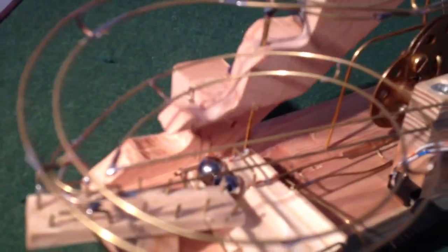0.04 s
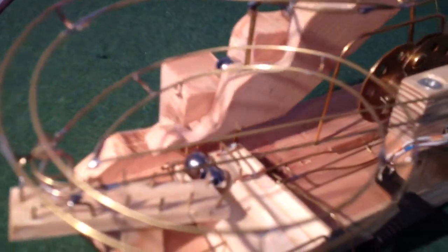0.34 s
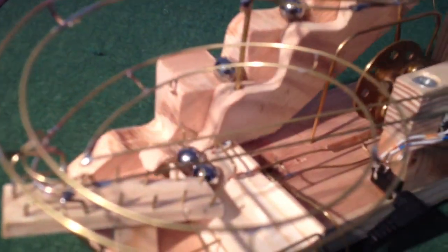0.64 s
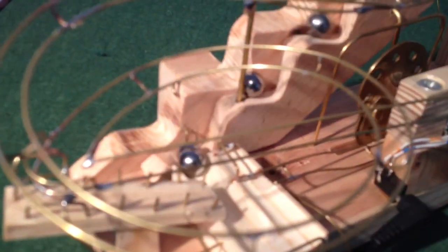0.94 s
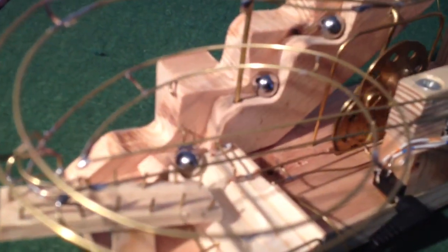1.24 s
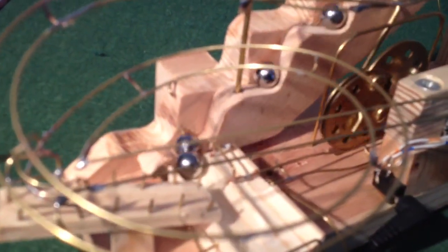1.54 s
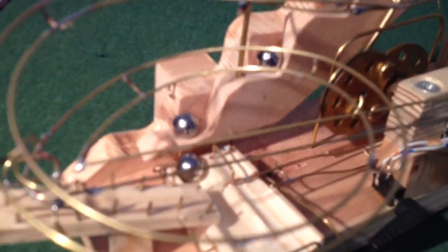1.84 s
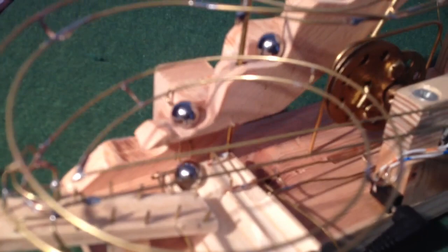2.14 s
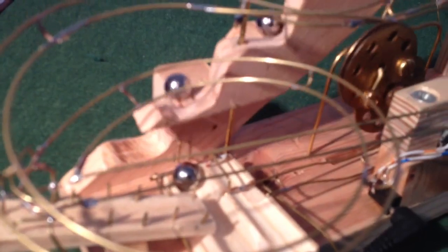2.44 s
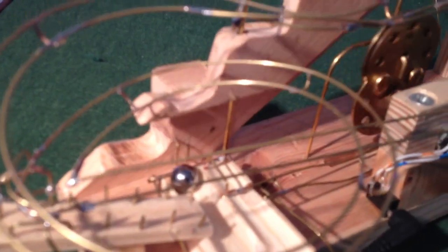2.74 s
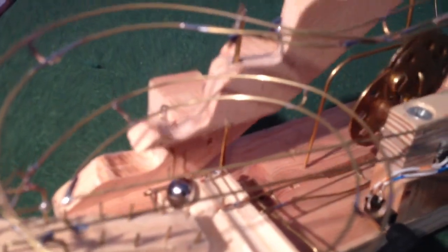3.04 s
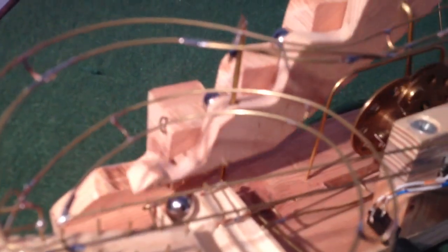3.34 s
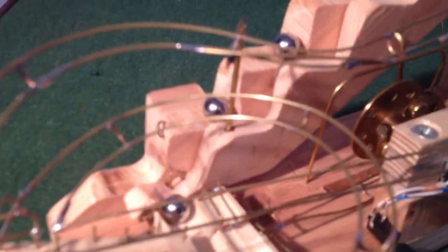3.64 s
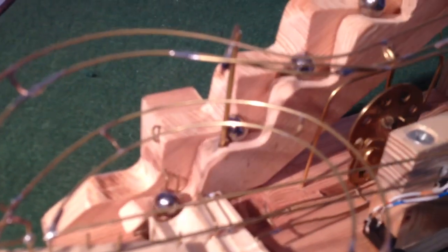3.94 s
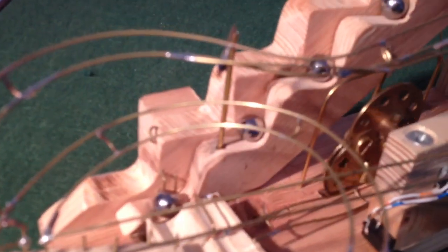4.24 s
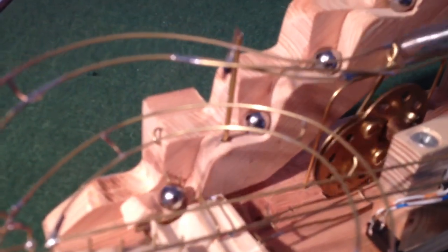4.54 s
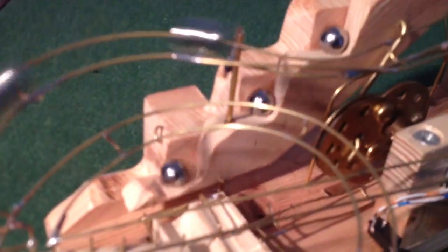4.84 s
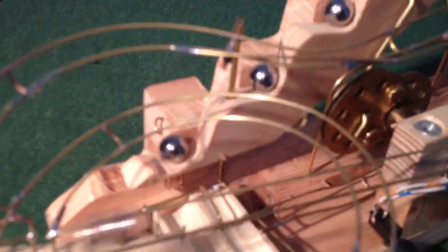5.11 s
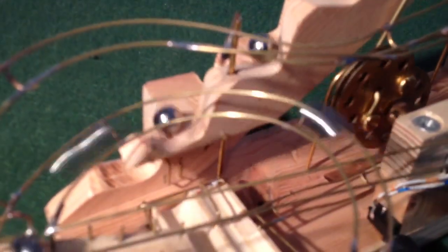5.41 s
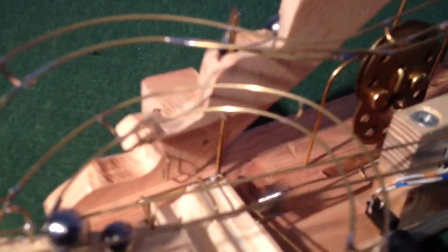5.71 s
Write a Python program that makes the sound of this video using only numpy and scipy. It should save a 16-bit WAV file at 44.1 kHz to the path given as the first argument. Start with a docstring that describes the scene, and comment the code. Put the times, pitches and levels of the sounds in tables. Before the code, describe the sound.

A small geared motor whines over a low rumble, slowing and speeding up as it cranks the wooden stair lift of a marble machine. Steel balls drop onto the steps in two quick bursts of knocks and clinks, about three seconds apart. Then a ball rolls down a spiral wire track with a growing metallic rasp and clatters into the bottom lane. The microphone is close, in a quiet room.

```python
"""A small geared motor whines, close to one microphone in a quiet room, cranking the wooden stair lift
of a marble machine. Its gears slow down and rumble under load and chatter when they run slack.
Steel balls skid, drop from step to step, bounce and clink, ringing the steps and the frame;
then one rolls down a spiral wire track and rattles into the bottom lane."""
import sys
import numpy as np
from scipy import signal
from scipy.fft import rfft, irfft, next_fast_len
from scipy.io import wavfile
from scipy.ndimage import uniform_filter1d

SR = 44100
rng = np.random.default_rng(int(sys.argv[2]) if len(sys.argv) > 2 else 0)


def log_audio(samples):
    """Write samples as a 16-bit WAV file to the path given in sys.argv[1]."""
    # one column per channel
    frames = np.atleast_2d(samples).T
    # limit to full scale, then quantise
    limited = np.clip(frames, -1, 1)
    pcm = np.round(limited * 32767).astype(np.int16)
    wavfile.write(sys.argv[1], SR, pcm)


N = 258867
TIME = np.arange(N) / SR


def from_db(db):
    """Decibels to gain."""
    return 10 ** (np.asarray(db) / 20)


def unit_rms(x):
    """Scale to rms 1."""
    return x / np.sqrt(np.mean(x ** 2) + 1e-20)


def drift(per_s):
    """Smooth random wander with a spread near 1."""
    knots = rng.standard_normal(8192)
    return np.interp(TIME * per_s, np.arange(len(knots)), knots)


def each_turn(rows, crank_turn_s=3.03):
    """Read a table that repeats with every turn of the crank."""
    return np.interp(TIME, *np.transpose(rows), period=crank_turn_s)


def coloured(x, spectrum):
    """Shape a sound with a spectrum that falls away beyond both ends; rms 1."""
    hz, db = np.transpose(spectrum)
    size = next_fast_len(N + 4096)
    bins = np.maximum(np.fft.rfftfreq(size, 1 / SR), 1)
    gain_db = np.interp(np.log(bins), np.log(hz), db)
    gain_db -= 24 * np.maximum(np.log2(hz[0] / bins), 0) + 25 * np.maximum(np.log2(bins / hz[-1]), 0)
    return unit_rms(irfft(rfft(x, size) * from_db(gain_db), size)[:N])


def ring(force, modes, sharpness, wander_db=0.0):
    """Long modes, each f / sharpness wide; they may swell and fade as a ball passes their nodes."""
    out = 0
    for k, (hz, db) in enumerate(modes):
        r = np.exp(-np.pi * hz / sharpness / SR)
        feedback = [1, -2 * r * np.cos(2 * np.pi * hz / SR), r * r]
        push = force * from_db(db + wander_db * drift(14))
        out += (-1) ** k * signal.lfilter(np.array([1, 0, -1]) * (1 - r * r) / 2, feedback, push + 1e-18)
    return out


# harmonics of the pinion: [multiple of the tooth rate, level/dB]
PINION_TONES = [(2, 0), (3, -2), (4, 3.5), (5, -2), (6, -0.5), (7, 2), (8, -2), (9, -0.5), (10, -3.5),
                (11, -19)]
# the gear housing rings where a mesh tone crosses its resonances: [f/Hz, level/dB]
HOUSING_RESPONSE = [(1500, -74), (2450, -58), (3400, -79), (3900, -62), (4350, -70), (4900, -80),
                    (5550, -63.5), (6200, -60), (7000, -70), (7800, -51), (8400, -56.5), (9100, -63),
                    (10200, -62), (10900, -55), (12300, -62), (15000, -78)]

def whine(turns, speed, teeth=12, waver_db=3.0, rasp=0.95):
    """Mesh tones and weaker ones between; uneven teeth make them buzz, and strain smears them."""
    strain = np.clip((102 - speed) / 10, 0, 1)   # the motor labours below 102 turns per s
    out = 0
    for harmonic, level_db in PINION_TONES:
        mesh = teeth * round(harmonic)
        slip = (1 + 2.5 * strain) * np.sqrt(harmonic / len(PINION_TONES)) * drift(400)
        tooth_errors = unit_rms(np.diff(rng.standard_normal(11)))
        buzz = 1 + .45 * np.interp(turns, np.arange(10) / 10, tooth_errors, period=1)
        for order, order_db in ((mesh, level_db), (mesh + 6, level_db - 7)):
            housing_db = np.interp(order * speed, *np.transpose(HOUSING_RESPONSE))
            gain = from_db(order_db + housing_db + waver_db * drift(21.96))
            phase = 2 * np.pi * order * turns + slip
            out += gain * (buzz * np.sin(phase) + rasp * drift(180) * np.cos(phase))
    return out


# backlash of the gears: [f/Hz, level/dB]
CHATTER_SPECTRUM = [(1000, -26), (1450, -14), (1800, -3.5), (2500, -4), (2900, -1), (3350, -13),
                    (4300, -59), (5000, -12.5), (8000, -6.5), (9500, -19.5)]
# tones of the free-running gears: [multiple of the motor speed, level/dB against the chatter]
SLACK_TONES = [(17, -13), (24, -10), (36, -13)]

def chatter(turns, slap, loose_play=1.05):
    """Backlash: the same teeth come round on every motor turn, with some loose play on top."""
    teeth = np.interp(turns % 1 * 360, np.arange(360), rng.standard_normal(360))
    force = slap * (teeth + loose_play * rng.standard_normal(N)) * from_db(1.2 * drift(120))
    tones = sum(from_db(db + 2.5 * drift(15)) * np.sin(2 * np.pi * order * turns + .4 * drift(200))
                for order, db in SLACK_TONES)
    return coloured(force, CHATTER_SPECTRUM) + tones


# hiss of sliding teeth and fine sizzle of dry teeth: [f/Hz, level/dB]
HISS_SPECTRUM = [(1000, -25), (2000, -2.5), (2700, 4), (3400, -5), (4150, 7.5), (5100, -7), (6500, 1),
                 (8100, -2), (9300, -6), (11000, -2.5), (15500, -17)]
SIZZLE_SPECTRUM = [(9800, -21), (11000, 3.5), (12600, -5), (13700, 2.5), (15500, -8)]
# tooth pressure and sizzle through one crank turn: [t/s, level/dB]
TOOTH_PRESSURE = [(0, -5), (.3, -1), (.82, -1), (.95, -23), (1.2, -8.5), (1.43, -11.5), (1.65, -6.5),
                  (2.3, -3.5), (2.65, -3.5)]
SIZZLE_CYCLE = [(0, -61), (.25, -52), (.6, -54.5), (.95, -55), (1.27, -65), (1.38, -55), (2.1, -64),
                (2.5, -54.5), (2.78, -69)]

def sliding_teeth(slap, hiss_db=-49.0, flutter_db=2.5, grit_db=3.0):
    """Teeth hiss with the pressure on them; their sizzle is lowest where the gears go slack."""
    friction = rng.standard_normal(N) * from_db(flutter_db * drift(150) + grit_db * drift(1200))
    hiss = coloured(friction, HISS_SPECTRUM) * from_db(hiss_db + each_turn(TOOTH_PRESSURE))
    sizzle = coloured(slap * rng.standard_normal(N), SIZZLE_SPECTRUM)
    return hiss + sizzle * from_db(each_turn(SIZZLE_CYCLE))


# motor speed through one crank turn: [t/s, turning rate/Hz]
MOTOR_SPEED = [(0, 117), (.25, 102.5), (.42, 100), (.78, 108.5), (.98, 104.5), (1.09, 107.5), (1.18, 120.5),
               (1.35, 121), (1.42, 98), (1.6, 83), (2.03, 74), (2.29, 74), (2.56, 106.5), (2.7, 113),
               (2.82, 120.5)]
# balance of the gear sounds at each speed: [turning rate/Hz, whine gain/dB, chatter gain/dB]
GEAR_BALANCE = [(78.4, -5.5, -74), (98, -2.5, -64), (106.5, -1.5, -64), (111.3, 0.5, -56), (114, 2, -50.5),
                (121.3, -10, -47.5)]

def motor(wobble=0.00309):
    """Each stroke of the stairs slows the motor; the gears chatter most when they run fast and slack."""
    speed = each_turn(MOTOR_SPEED)
    turns = np.cumsum(speed * (1 + wobble * drift(45))) / SR
    speeds, *levels = np.transpose(GEAR_BALANCE)
    whine_gain, chatter_gain = [from_db(np.interp(speed, speeds, db)) for db in levels]
    slap = np.exp(.3 * np.cos(2 * np.pi * turns))   # one swell per motor turn
    return chatter_gain * chatter(turns, slap) + sliding_teeth(slap) + whine_gain * whine(turns, speed)


# rumble of the frame: [f/Hz, level/dB]
RUMBLE_SPECTRUM = [(50, -31), (68, -26.5), (92, -5.5), (112, -8), (137, 3.5), (172, -7), (198, -3),
                   (225, -15), (290, -6.5), (330, -21.5), (375, -8.5), (420, -19), (900, -23), (1600, -20)]
# load on the frame through one crank turn: [t/s, level/dB]
FRAME_LOAD = [(0, -3.5), (.2, 0.5), (.7, 1.5), (.92, -2.5), (1.17, -9), (1.3, -7.5), (1.42, -3),
              (2.12, -0.5), (2.21, 1), (2.5, 2), (2.72, -1.5), (2.85, -9)]

def frame_rumble(level_db=-55.5, deep_hz=115, deep_swing=1.7, throb_db=2.0):
    """The loaded frame rumbles and throbs; its deepest part follows the load most."""
    load_db = each_turn(FRAME_LOAD)
    noise = coloured(rng.standard_normal(N) * from_db(throb_db * drift(24)), RUMBLE_SPECTRUM)
    deep = signal.sosfiltfilt(signal.butter(4, deep_hz, fs=SR, output="sos"), noise)
    return from_db(level_db) * ((noise - deep) * from_db(load_db) + deep * from_db(deep_swing * load_db))


def ticks(per_s=35, level_db=-57.0, spread_db=0.5, t60_s=0.0083):
    """Crank, pivots and waiting balls give faint ticks at random."""
    sizes = from_db(spread_db * np.minimum(rng.exponential(1, N), 2.5))
    clicks = sizes * (rng.random(N) < per_s / SR)
    envelope = signal.lfilter([1], [1, -from_db(-60 / (t60_s * SR))], clicks + 1e-18)
    return from_db(level_db) * envelope * coloured(rng.standard_normal(N), HISS_SPECTRUM)


# a ball skids or jostles: [t/s, level/dB, share on wood rather than wire 0-1]
BALL_SKIDS = [(0.467, -40, 0.8), (0.614, -40.5, 0.3), (0.647, -41, 0.4), (1.754, -48.5, 0), (2.579, -42, 1),
              (2.637, -35.5, 1), (3.448, -40, 1), (3.822, -34, 0.43), (4.262, -42, 0), (4.396, -40, 1),
              (4.446, -31, 0), (5.22, -26, 0), (5.344, -30, 0), (5.521, -26.5, 0.12), (5.676, -26.5, 0.17)]
# a ball rolls off a step, along the top ramp, down the spiral or into the bottom lane:
# [t/s, length/s, starting level/dB, swell/(dB per s), 60 dB decay/s, share on wood 0-1]
BALL_ROLLS = [(0.637, 0.21, -52.5, -9, 0.04, 1), (3.544, 0.11, -49.5, -1, 2.5, 1),
              (3.969, 0.12, -42.5, -1, 0.47, 0.8), (4.1, 0.38, -49.5, 21.5, 5, 0.1),
              (4.457, 0.89, -37.5, 6, 2, 0), (4.69, 0.19, -41, 11, 1.5, 0.05),
              (5.247, 0.27, -34.5, 1, 1.8, 0.06), (5.57, 0.21, -35.5, -18, 4, 0.74)]

def roll_power(skid_t60_s=0.28, skid_attack_s=0.0016, roll_attack_s=0.014):
    """Total power and the part on wood: skids just die away, rolls first swell or sink with speed."""
    skids = [(s, 0, db, 0, skid_t60_s, wood, skid_attack_s) for s, db, wood in BALL_SKIDS]
    rolls = [(*row, roll_attack_s) for row in BALL_ROLLS]
    power = on_wood = 0
    for s, length, db, swell, t60, wood, attack in skids + rolls:
        age = TIME - s
        level_db = db + swell * np.clip(age, 0, length) - 60 * np.clip((age - length) / t60, 0, 2)
        part = (np.clip(age / attack, 0, 1) * from_db(level_db)) ** 2
        power += part
        on_wood += wood * part
    return power, on_wood


def bumps(per_s=6000, spread_db=1.5):
    """Tiny random impacts under a rolling ball; rms 1."""
    sizes = from_db(spread_db * np.minimum(rng.exponential(1, N), 4)) * rng.choice([-1, 1], N)
    return unit_rms(sizes * (rng.random(N) < per_s / SR))


def along_the_rail(force, echo=0.37, echo_s=.0014):
    """Bumps echo from the nearest support; the delay wanders as the ball travels, so resonances slide."""
    delay = echo_s * np.exp(0.292 * drift(5))
    return force + echo * np.interp(TIME - delay, TIME, force)


# rasp of a rolling ball, and the board drumming under it: [f/Hz, level/dB]
RASP_SPECTRUM = [(200, -43), (480, -15), (800, -24.5), (1200, -15.5), (1700, -8), (2050, 1), (2900, -2),
                 (4300, 3), (4900, -3), (7500, 1), (8900, -1), (9800, -6.5), (11800, -6), (13500, -14),
                 (15500, -18)]
BOARD_SPECTRUM = [(220, -1), (550, -5), (900, -8.5), (1500, -4), (2500, -3)]
# long modes of the wire track and of the wooden frame: [f/Hz, level/dB]
WIRE_MODES = [(1388, -2), (2028, -2.5), (2170, 1.5), (2654, -2), (3071, -1), (3442, 0.5), (4085, 0),
              (4355, 0.5), (5425, -3), (5780, -5.5), (6149, -3.5), (6336, -5), (7300, -1.5), (7530, -3),
              (8450, -3.5)]
FRAME_MODES = [(375, -12), (1385, -2.5), (1728, -14), (1932, -4), (2060, -4.5), (2170, -6), (2300, -1.5),
               (2550, -11), (2660, -8), (3075, 2), (3450, -9.5), (3624, 0), (3760, 0.5), (4380, 3.5),
               (5500, -13), (6200, 2), (7500, 2)]
FRAME_SHARPNESS = 79

def rolling(wire_db=-3.5, frame_db=-3.5, board_db=-9.5, rumble_db=-22.0, judder_db=1.88):
    """Bumps under a skidding or rolling ball rasp, ring the wire or the wood, and build up a rumble."""
    power, on_wood = roll_power()
    on_wire = np.maximum(power - on_wood, 0)
    judder = unit_rms(from_db(judder_db * drift(170)))
    force = bumps() * judder
    rasp = np.sqrt(power) * coloured(along_the_rail(force), RASP_SPECTRUM)
    wire = from_db(wire_db) * unit_rms(ring(bumps() * judder, WIRE_MODES, sharpness=137, wander_db=2.5))
    board = from_db(board_db) * coloured(force, BOARD_SPECTRUM)
    frame = from_db(frame_db) * unit_rms(ring(bumps() * judder, FRAME_MODES, FRAME_SHARPNESS))
    build_up = uniform_filter1d(np.sqrt(power), int(0.13 * SR))
    rumble = build_up * from_db(rumble_db) * coloured(rng.standard_normal(N), RUMBLE_SPECTRUM)
    return rasp + np.sqrt(on_wire) * wire + np.sqrt(on_wood) * (board + frame) + rumble


# a ball lands or bounces on a step or in the bottom lane:
# [t/s, level/dB, board thud/dB, brightness/(dB per octave), frame shake/dB]
BALL_LANDINGS = [(0.5486, -17, 5, -7, -0.5), (0.5779, -15, 4.5, -7, -1), (0.6128, -16.5, 3, -7, 0),
                 (0.6447, -12, -4.5, -14, -2), (0.689, -29, 8, -21, 9), (0.729, -14, 2, 0, 4),
                 (0.7629, -13, 5.5, -3.5, 4), (1.0407, -30.5, 18, 9, -2.5), (2.537, -31, 13, -15, 3),
                 (2.647, -17, 8, 3, 2.5), (3.5262, -15.5, 2, -4.5, -4), (3.5567, -18.5, 4, -17, -2),
                 (3.5896, -17, 3, -16, -1), (3.6187, -15, 0, -8.5, 1), (3.6867, -14, 0, -24, -2),
                 (3.718, -18, 6.5, -10, -1), (3.742, -12.5, -3, -1, -9.5), (5.402, -5, -5, -7.5, -1.5),
                 (5.544, -17, -1, -3, 8), (5.577, -19.5, -8, -2, 6), (5.666, -10.5, -11, -5, 2),
                 (5.843, -15, -3, -3.5, -6)]
# a ball clinks against another: [t/s, level/dB]
BALL_CLINKS = [(0.858, -19.5), (0.889, -35), (0.906, -28), (1.838, -33.5), (2.575, -35), (3.774, -24),
               (3.884, -18.5), (4.083, -24)]
# wood taps dully on wood: [t/s, level/dB, frame shake/dB]
WOOD_TAPS = [(1.103, -28.5, 1), (1.1095, -29, -1), (1.892, -34, -5), (4.121, -29.5, 3), (4.144, -31.5, -2),
             (4.924, -32.5, -3)]
# a ball ticks dryly against the guide wire: [t/s, level/dB]
GUIDE_WIRE_TICKS = [(2.51, -22.5)]
# centres of the board, body, edge and steel bands: [f/Hz]
BAND_CENTRES = [700, 2100, 4100, 7000]
# tone of each kind of blow in those four bands: [level/dB]
LANDING_BANDS = [-32, -12.5, -14.5, -26]
CLINK_BANDS = [-22.5, -16.5, -13.5, -12]
TAP_BANDS = [-14, -17, -24, -25]

def blows(edge_bands_db=(-37, -14.5, -11, -41), edge_shake_db=-9):
    """Every blow on wood or steel as [t/s, level/dB, four band levels/dB, frame shake/dB]."""
    octaves = np.log2(np.array(BAND_CENTRES[1:]) / BAND_CENTRES[1])
    rows = [(s, db, LANDING_BANDS + np.r_[thud_db, brightness * octaves], shake_db)
            for s, db, thud_db, brightness, shake_db in BALL_LANDINGS]
    rows += [(s, db, CLINK_BANDS, 0) for s, db in BALL_CLINKS]
    rows += [(s, db, edge_bands_db, edge_shake_db) for s, db in GUIDE_WIRE_TICKS]
    return rows + [(s, db, TAP_BANDS, shake_db) for s, db, shake_db in WOOD_TAPS]


# short modes of a wooden step with a ball on it: [f/Hz, level/dB]
STEP_MODES = [(380, -11.5), (540, -2.5), (780, -5), (1080, -3), (1420, 3.5), (1750, 3.5), (2130, 8.5),
              (2560, 9), (2880, 4.5), (3550, -1.5), (4000, 5), (4500, -8.5), (5400, -7), (6300, 0.5),
              (7300, -7), (8500, -8)]

def struck_step(t, spread_s=0.00084, scatter_db=2.0):
    """A step rings briefly; arrival, strength and sign of each mode vary with where the ball lands."""
    hz, db = np.transpose(STEP_MODES)
    t60 = 0.014 * (2000 / hz[:, None]) ** 0.53   # higher modes die sooner
    age = np.maximum(t - spread_s * rng.random((len(hz), 1)), 0)
    modes = np.sin(2 * np.pi * hz[:, None] * age) * from_db(-60 * age / t60)
    strengths = from_db(db + scatter_db * rng.standard_normal(len(hz))) * rng.choice([-1, 1], len(hz))
    return strengths @ modes


# limits of the board, body, edge and steel bands: [f/Hz]
BAND_LIMITS = [300, 1270, 3100, 5500, 10000]

def knocks(level_db=-3.5, ring_db=3.0, buzz_db=-4.0, buzz_t60_s=0.12, travel_s=0.001176):
    """Each blow sounds the step; the ball buzzes as it settles and the frame rings on."""
    t = TIME[:SR // 5]
    bands = [signal.butter(4, edges, "band", fs=SR, output="sos")
             for edges in zip(BAND_LIMITS, BAND_LIMITS[1:])]
    direct, shaken = np.zeros((2, N + len(t)))
    for s, blow_db, bands_db, shake_db in blows():
        step = struck_step(t)
        parts = [signal.sosfilt(band, step) for band in bands]
        knock = sum(from_db(blow_db + level_db + db) * part / np.std(part[:SR // 200])
                    for db, part in zip(bands_db, parts))   # levels hold for the first 5 ms
        settling = rng.standard_normal(len(t)) * rng.exponential(1, len(t))
        settling *= from_db(-60 * t / buzz_t60_s) * (t > .002)
        buzz = signal.fftconvolve(knock, settling / np.linalg.norm(settling))[:len(t)]
        start = int((s + travel_s) * SR)
        direct[start:start + len(t)] += knock + buzz * from_db(shake_db + buzz_db)
        shaken[start:start + len(t)] += knock * from_db(shake_db + ring_db)
    return direct[:N] + ring(shaken[:N], FRAME_MODES, FRAME_SHARPNESS)


def room(x, wet_db=-6, t60_s=0.37, delay_s=0.0024):
    """Dense reflections from the table and walls reach the microphone just after the direct sound."""
    t = TIME[:SR // 2]
    tail = rng.standard_normal(len(t)) * from_db(-60 * t / t60_s) * (t > delay_s)
    return x + from_db(wet_db) * signal.fftconvolve(x, tail / np.linalg.norm(tail))[:N]


def scene():
    """The machine from close by, in mono; the room answers only the knocks."""
    return (motor() + frame_rumble() + ticks() + room(knocks()) + rolling())[None]


def record(dry):
    """The microphone signal is cut steeply above 15.6 kHz."""
    return signal.sosfilt(signal.ellip(12, .1, 85, 15600, fs=SR, output="sos"), dry)


dry = scene()
out = record(dry)
log_audio(out)
```